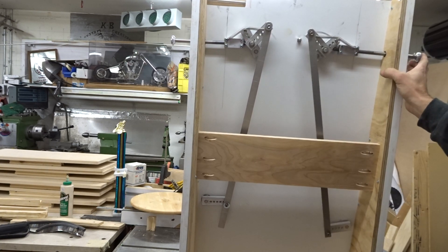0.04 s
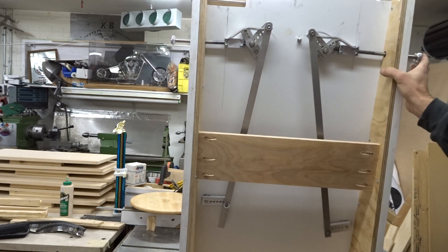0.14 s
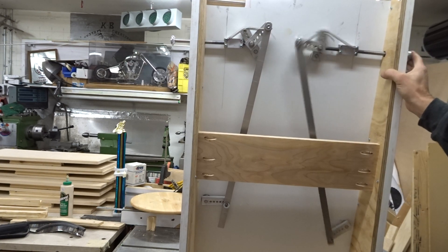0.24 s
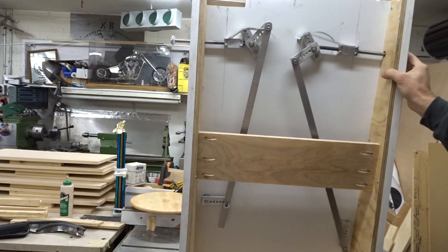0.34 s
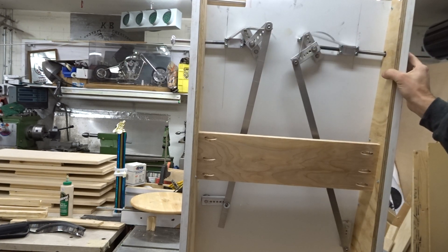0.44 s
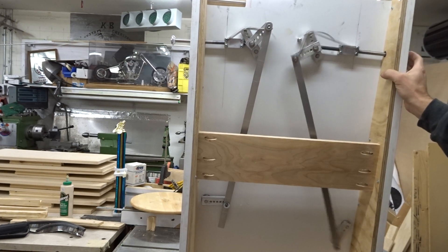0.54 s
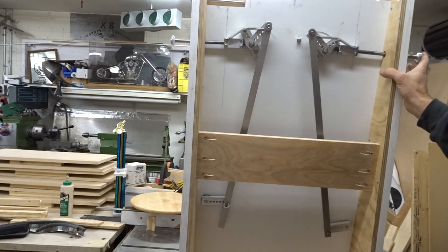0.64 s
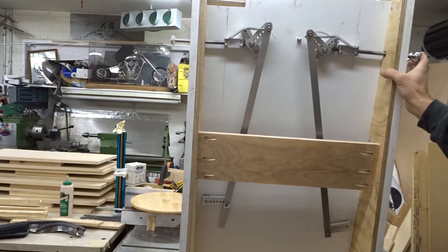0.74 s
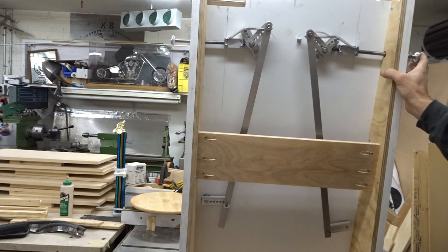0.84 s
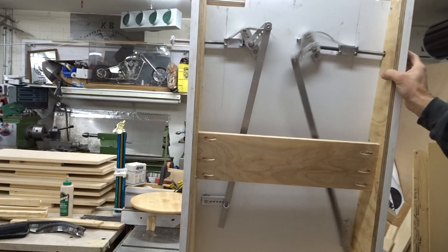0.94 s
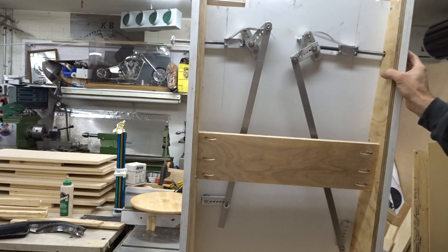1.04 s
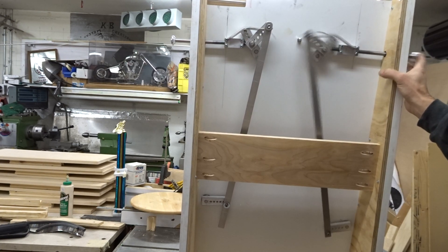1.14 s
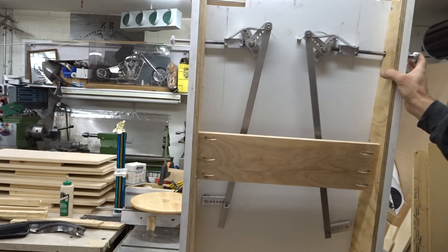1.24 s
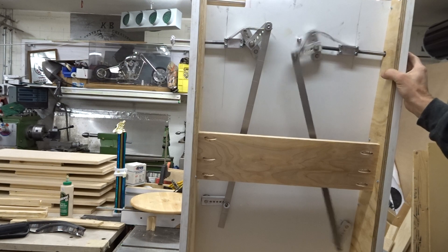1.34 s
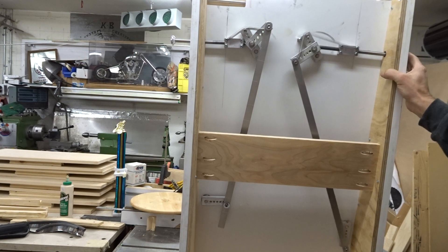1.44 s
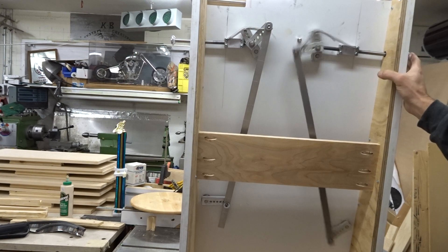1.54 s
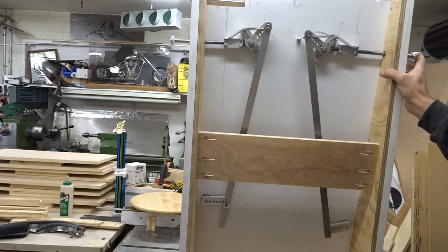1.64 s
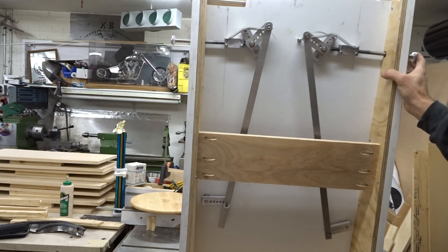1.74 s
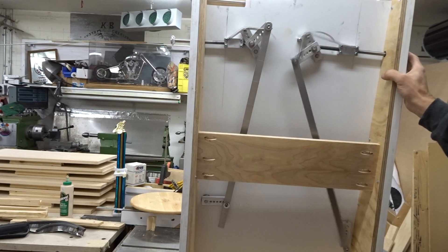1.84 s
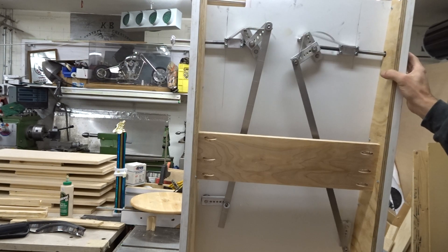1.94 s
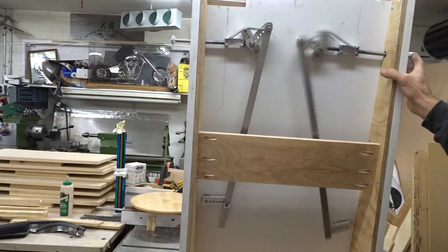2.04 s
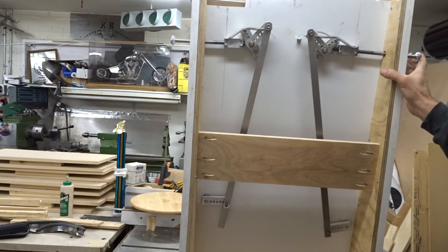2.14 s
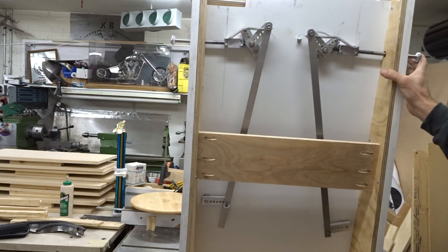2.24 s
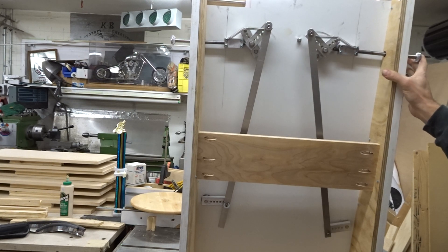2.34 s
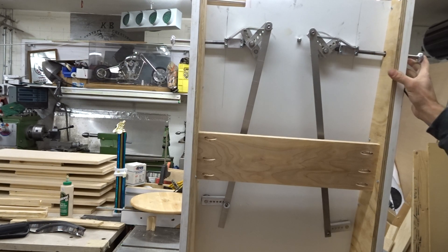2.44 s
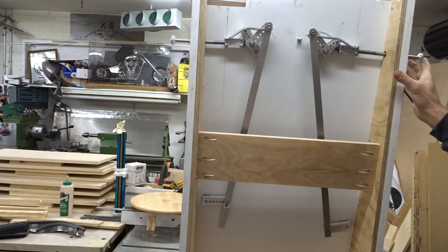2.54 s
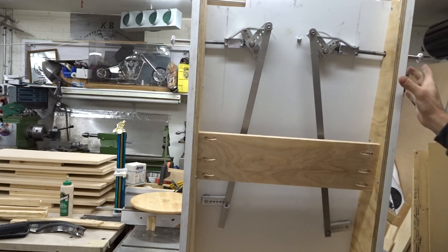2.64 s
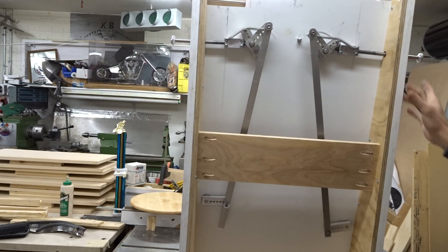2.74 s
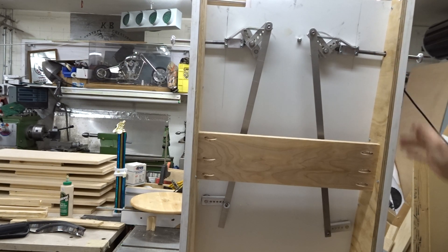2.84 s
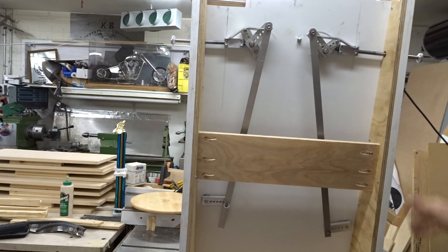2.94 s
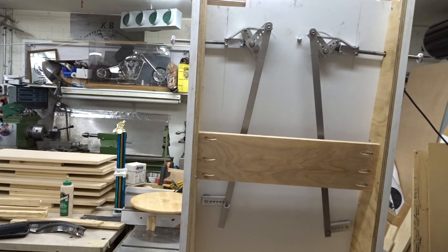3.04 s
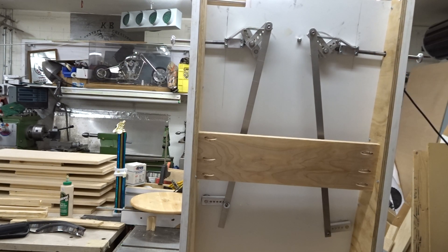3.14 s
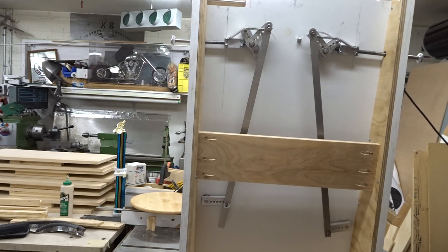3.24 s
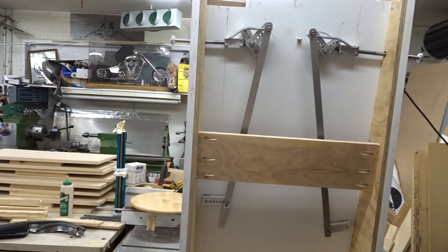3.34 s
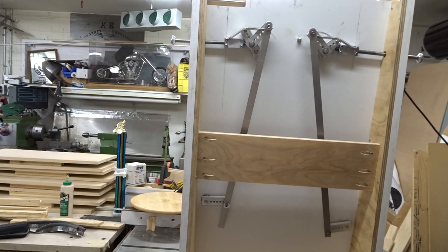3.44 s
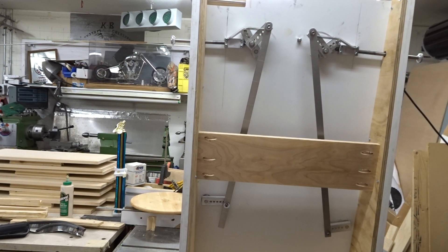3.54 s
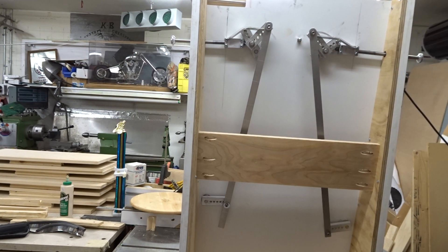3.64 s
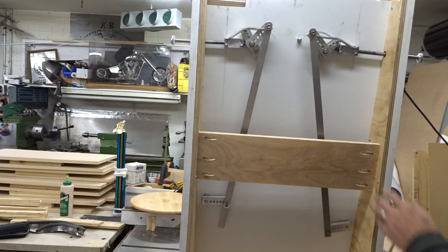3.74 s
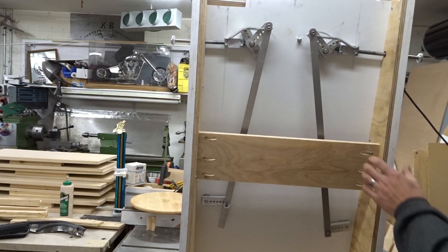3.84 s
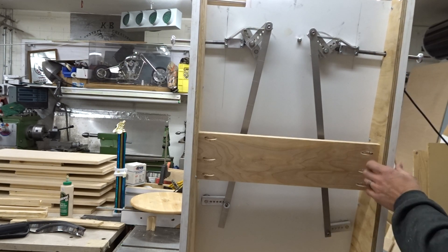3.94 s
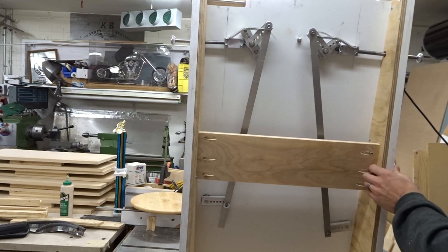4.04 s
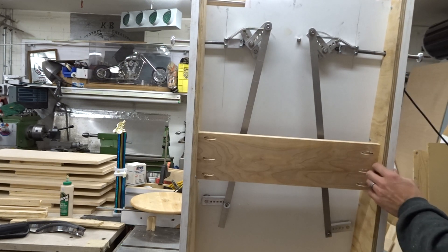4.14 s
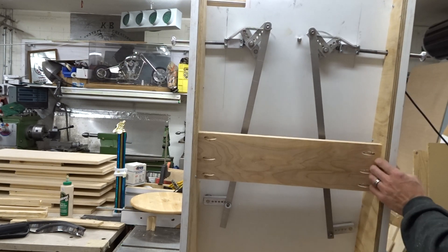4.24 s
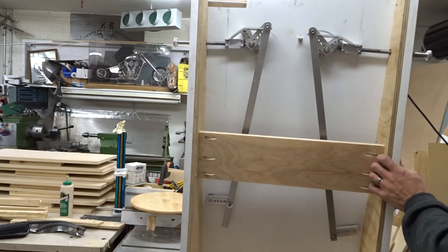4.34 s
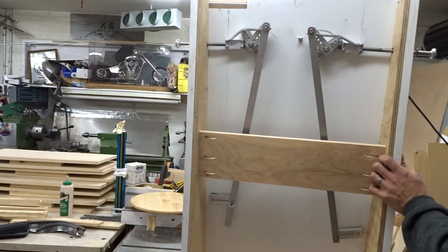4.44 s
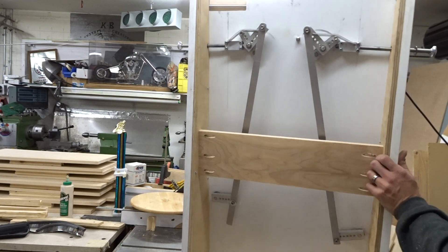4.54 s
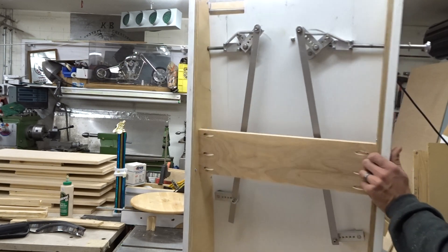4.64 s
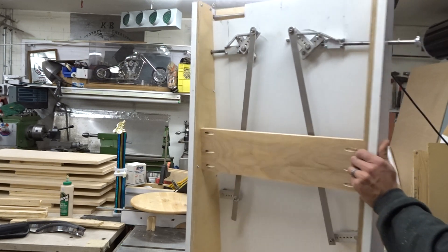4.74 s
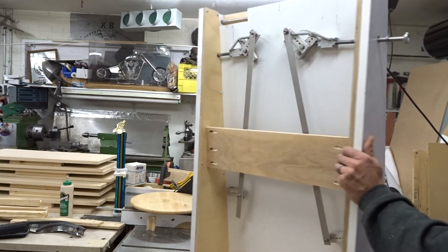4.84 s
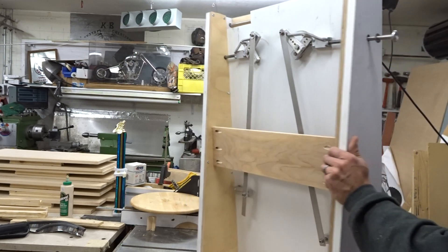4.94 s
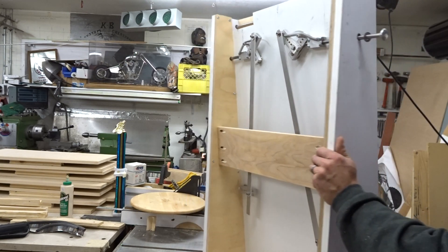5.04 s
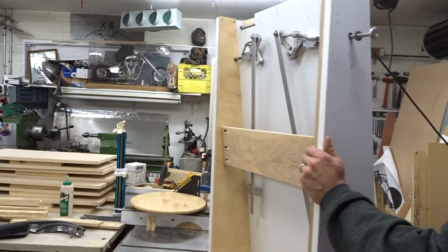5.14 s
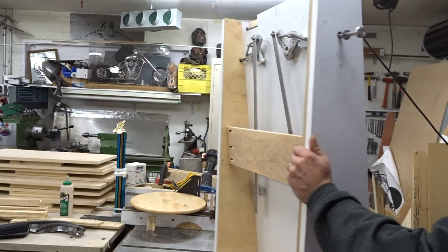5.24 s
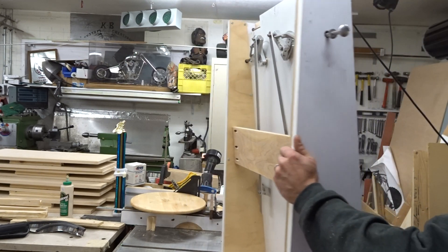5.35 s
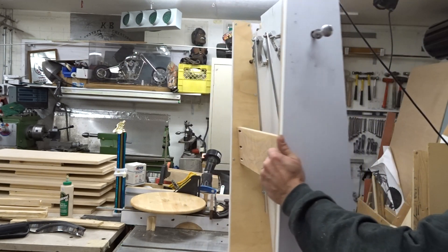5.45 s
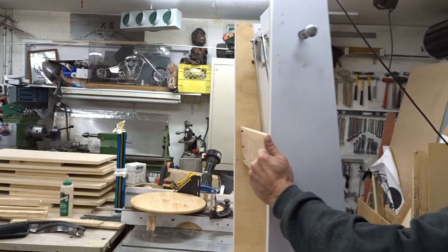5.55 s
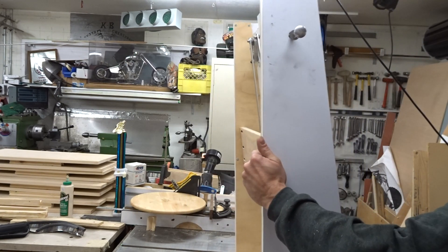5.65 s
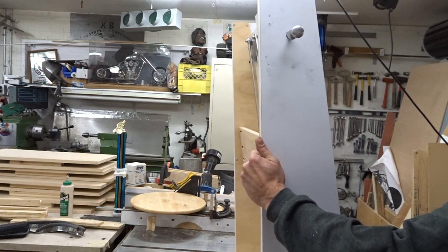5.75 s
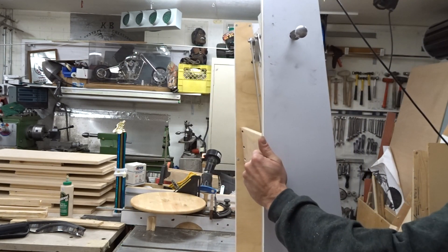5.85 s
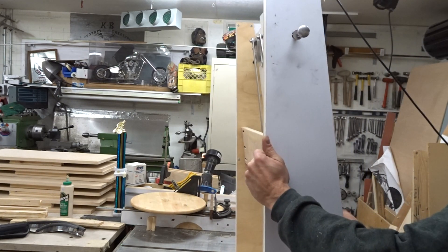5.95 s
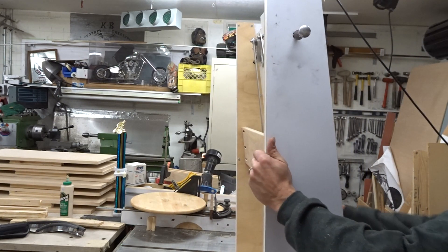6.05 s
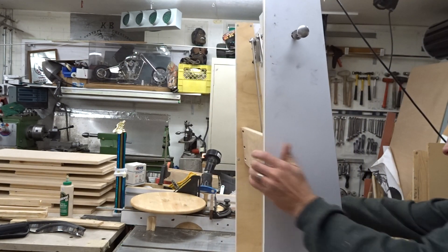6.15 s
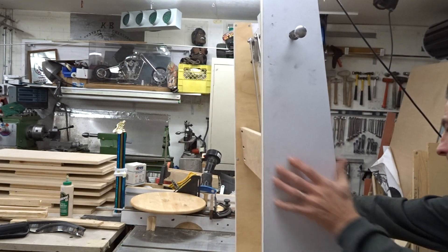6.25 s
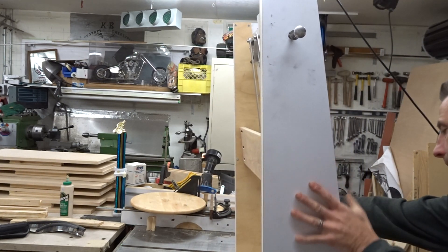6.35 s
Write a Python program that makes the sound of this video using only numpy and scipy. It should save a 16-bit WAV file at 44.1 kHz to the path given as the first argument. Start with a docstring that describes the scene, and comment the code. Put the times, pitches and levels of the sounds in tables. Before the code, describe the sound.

Rapid hard metal-and-wood clacks in a small workshop, a quiet pause with soft bumps, a grinding wooden scrape, dull thuds and a hand brush.

```python
"""You hear clacks, knocks, snaps and thin pings, then bumps, thuds, scraping and a soft bright hiss.
A steel flipper linkage on a wooden pinball cabinet is worked by hand in a small workshop: a push slides
the rod and slams a long flat bar on its stop, a release lets it fall back. The cabinet is then gripped,
scraped round on the bench and set down, and a hand brushes its side. Blows and tiny slips make wood
and steel ring; two sine tones make each ping. A limiter flattens the loud clacks."""
import sys
import numpy as np
from scipy import signal
from scipy.fft import rfft, irfft
from scipy.io import wavfile
from scipy.ndimage import uniform_filter1d, minimum_filter1d

SR = 44100
rng = np.random.default_rng(int(sys.argv[2]) if len(sys.argv) > 2 else 0)


def unload_audio(sound):
    """Save the sound as a 16-bit wav file, at the path given as the first command line argument."""
    columns = np.transpose(np.atleast_2d(sound))
    # keep every value between -1 and 1, then stretch to whole-number steps
    steps = np.round(np.clip(columns, -1, 1) * 32767)
    wavfile.write(sys.argv[1], SR, steps.astype(np.int16))


N = 282240
TIME = np.arange(N) / SR
TAIL = TIME[:SR * 3 // 4]   # time axis of every ring and echo

# tone colour of a wooden knock: [f/Hz, relative level per Hz/dB]
KNOCK_SPECTRUM = [(60, -43.5), (150, -8.5), (300, -3.5), (550, 2), (800, 3.5), (1200, 3.3), (1700, 3.3),
                  (2400, 1), (3300, -3.7), (4500, -10), (8000, -20.5), (16000, -58)]
# pushes: [start t/s, jolt t/s, stop t/s, contact time at the stop/s, take-up level/dB,
#          extra level of the wood at the stop and of the drive towards it/dB, spring ping level/dB]
PUSH_EVENTS = [(0.214, 0.248, 0.357, .011, -7.5, 1.5, -22.5), (0.926, 0.951, 0.995, .013, -0.5, 4, -20.5),
               (1.344, 1.346, 1.426, .006, -3, -0.5, -36), (1.809, 1.87, 1.898, .004, -7.5, -1, -40)]
# releases: [fall t/s, snap t/s, extra level of the wood in the fall and of the rush into it/dB,
#            snap level/dB, lower spring tone level/dB, upper spring tone level/dB]
RELEASE_EVENTS = [(-0.02, 0.0, -0.5, -9.5, -36, -23), (0.638, 0.667, 1, -1.2, -31, -20.5),
                  (1.177, 1.208, -1.5, 2, -18.5, -30), (1.611, 1.661, -12, -16.5, -20, -28.5),
                  (2.097, 2.12, 5.5, -0.5, -21.5, -33.5)]
# rod driven forward before each stop: [duration/s, wood level/dB, steel level/dB], before FRICTION_DB
DRIVE_RUB = (.085, -23.3, -27.3)


def from_db(db):
    """Turn decibels into a gain."""
    return 10 ** (np.asarray(db) / 20)


def rms_one(x):
    """Scale to an rms (average strength) of one."""
    return x / np.sqrt(np.mean(x ** 2) + 1e-20)


def fade(t, t60):
    """Free decay: energy leaks away steadily, 60 dB down after t60 seconds."""
    return np.exp(-np.log(1000) * t / t60)


def at_hz(points, hz):
    """Read a table between its points, on a log-frequency axis."""
    points = np.array(points)
    return np.interp(np.log(hz + 1), np.log(points[:, 0]), points[:, 1])


def colour(x, spectrum):
    """Give a steady signal the tone colour of a spectrum."""
    hz = np.fft.rfftfreq(x.shape[-1], 1 / SR)
    return rms_one(irfft(rfft(x) * from_db(at_hz(spectrum, hz)), x.shape[-1]))


def band(x, edges_hz, kind):
    """Butterworth filter that only looks back in time."""
    edges_hz = np.clip(edges_hz, 10, .45 * SR)
    return signal.sosfilt(signal.butter(2, edges_hz, kind, fs=SR, output="sos"), x)


def waver(rate_hz, depth_db):
    """A gain that wanders at random, one for each channel; depth_db is its rms swing."""
    return from_db(depth_db * rms_one(band(rng.standard_normal((2, N)), rate_hz, "low")))


def diffuse(size):
    """Sound from all around on two close microphones: alike in the bass, apart in the treble."""
    # difference between left and right against what they share: [f/Hz, side minus mid level/dB]
    side_levels = [(60, -19), (110, -29), (200, -35.5), (380, -21), (700, -15), (1290, -10), (2380, -6),
                   (4400, -4), (8120, -1.5), (15000, 2)]
    mid, side = rfft(rng.standard_normal((2, size)))
    width = from_db(at_hz(side_levels, np.fft.rfftfreq(size, 1 / SR)))
    return irfft((mid + side * width * [[1], [-1]]) / np.sqrt(1 + width ** 2), size)


def clicks(times, levels_db):
    """One impulse for each contact."""
    out = np.zeros(N)
    at = np.round(np.array(times) * SR).astype(int)
    heard = (at >= 0) & (at < N)
    out[at[heard]] = from_db(levels_db)[heard]
    return out


def contacts(times, lengths, levels_db):
    """Blows whose force swells and dies over the contact time; 0 dB carries unit energy."""
    pad = len(TAIL)   # room for blows that begin before the start or end after the finish
    out = np.zeros(N + 2 * pad)
    for s, length, db in zip(times, np.maximum(lengths, .001), levels_db):
        shape = TAIL * np.exp(-TAIL / length)
        at = pad + round(s * SR)
        out[at:at + pad] += from_db(db) * shape / np.linalg.norm(shape)
    return out[pad:pad + N]


def grains(per_s, spread_db):
    """Friction: tiny slips of uneven size at random moments."""
    sizes = from_db(spread_db * np.minimum(rng.exponential(1, N), 4)) * rng.choice([-1, 1], N)
    return rms_one(sizes * (rng.random(N) < per_s / SR))


def modes(table):
    """Ring of a struck body: one fading sine for each way it can vibrate."""
    ring = 0
    for k, (hz, db, t60) in enumerate(table):
        ring = ring + (-1) ** k * from_db(db) * np.sin(2 * np.pi * hz * TAIL) * fade(TAIL, t60)
    return rms_one(ring)


def wooden(table):
    """A ringing board; it radiates little below its lowest modes."""
    return band(band(modes(table), 89, "high"), 68.4, "high")


def burst(spectrum, t60):
    """Countless close modes that die together, made of fading noise."""
    return rms_one(colour(rng.standard_normal(len(TAIL)), spectrum) * fade(TAIL, t60))


def workshop(wet_db):
    """Room response: direct sound, a sample earlier on the right, then echoes that die band by band."""
    # how long the echoes last: [f/Hz, t60/s]
    echo_t60 = [(100, 0.27), (700, 0.245), (2000, 0.225), (6000, 0.19), (16000, 0.13)]
    noise = rfft(diffuse(len(TAIL)))
    hz = np.fft.rfftfreq(len(TAIL), 1 / SR)
    octave = np.round(np.log2(np.clip(hz, 128, 16384)))
    tail = 0
    for k in np.unique(octave):
        tail = tail + irfft(noise * (octave == k), len(TAIL)) * fade(TAIL, at_hz(echo_t60, 2 ** k))
    swelling_tail = tail * (1 - fade(TAIL, 0.0067))
    out = from_db(wet_db) * rms_one(swelling_tail) / np.sqrt(len(TAIL))
    out[[0, 1], [1, 0]] += 1   # direct sound: left at sample 1, right at sample 0
    return out


def sound(force, wet_db, body=(1,)):
    """A force drives a body in the room; a unit click gives rms 1 over its first 30 ms."""
    response = signal.fftconvolve(workshop(wet_db), np.array([body]), axes=1)[:, :len(TAIL)]
    response /= np.sqrt(np.mean(response[:, TAIL < .03] ** 2))
    return signal.fftconvolve(force[None], response, axes=1)[:, :N]


def workshop_rumble():
    """The quiet background of the workshop: steady noise, strongest in the bass."""
    # tone colour: [f/Hz, relative level per Hz/dB]
    rumble_spectrum = [(12, -48.5), (20, -28.5), (81, 1.5), (146, -13.5), (328, -15), (624, -14),
                       (802, -19), (1290, -14), (1960, -19.5), (2530, -23), (3250, -22.5), (16000, -37.5)]
    return from_db(-56.8) * colour(diffuse(N), rumble_spectrum)


def blow(s, kind, db=0, wood_db=0, contact_s=None):
    """One blow of a kind, as (t/s, contact time/s, boom/dB, knock/dB, steel/dB)."""
    usual_s, boom_db, knock_db, steel_db = kind
    return s, contact_s or usual_s, boom_db + db, knock_db + db + wood_db, steel_db + db


def blows():
    """A push is a take-up, a jolt and a slam; a release is a fall, a snap and a small bounce."""
    # kinds of blow: [contact time/s, panel boom level/dB, wooden knock level/dB, steel level/dB]
    # the rod takes up its play
    take_up = (.004, -36, -33, -40)
    # the moving rod strikes its guide
    guide_jolt = (.0045, -40, -31.5, -55)
    # the bar hits its stop
    slam = (.006, -12, -13, -11.5)
    # the bar falls back
    fall_back = (.012, -22.5, -12.5, -29)
    # the joints snap home
    joint_snap = (.0045, -21.5, -13.5, -12)
    # the bar bounces once after the snap
    bounce = (.003, -38, -41, -37)
    # the loose rod drops in its guide
    rod_drop = (.0045, -48, -21.8, -43)
    # the hand lets go and the rod settles: [t/s, contact time/s, added level/dB]
    rod_settles = [(2.492, .0045, 0), (2.58, .014, -21), (2.674, .015, -11), (2.8, .02, -25)]
    bounce_delay_s = .05
    rows = [blow(s, rod_drop, db, contact_s=contact_s) for s, contact_s, db in rod_settles]
    for start, jolt, stop, contact_s, take_up_db, wood_db, _ in PUSH_EVENTS:
        rows.append(blow(start, take_up, take_up_db))
        rows.append(blow(jolt, guide_jolt))
        rows.append(blow(stop, slam, wood_db=wood_db, contact_s=contact_s))
    for fall, snap, wood_db, snap_db, _, _ in RELEASE_EVENTS:
        rows.append(blow(fall, fall_back, wood_db=wood_db))
        rows.append(blow(snap, joint_snap, snap_db))
        rows.append(blow(snap + bounce_delay_s, bounce))
    return np.transpose(rows)


def rubbing():
    """Drag of the rod on wood and steel: driven to the stop, held there, rushing back, then swaying on."""
    # levels below are before FRICTION_DB
    # rod held against the stop: [wood level/dB, steel level/dB]
    hold_levels = (-33.5, -43.5)
    # gathering speed into each fall: [time constant/s, wood level/dB, steel level/dB]
    rush_rub = (.007, -22, -32)
    # swaying after each snap: [t60/s, wood level/dB, steel level/dB]
    sway_rub = (1.4, -38.5, -68)
    FRICTION_DB = -39   # force of steady rubbing against that of a blow
    speed_up_s = .025

    def slide(start, stop):
        """Rubbing that grows as the rod speeds up and ends at once."""
        return np.clip((TIME - start) / speed_up_s, 0, 1) * (TIME < stop)

    drive = np.zeros(N)
    for start, _, stop, _, _, wood_db, _ in PUSH_EVENTS:
        begin = max(start, stop - DRIVE_RUB[0] - speed_up_s / 2)
        drive += from_db(wood_db) * slide(begin, stop)
    # each push is held until the next fall
    hold = sum(slide(stop, fall) for (_, _, stop, *_), (fall, *_) in zip(PUSH_EVENTS, RELEASE_EVENTS[1:]))
    rush, sway = np.zeros(N), np.zeros(N)
    for fall, snap, wood_db, *_ in RELEASE_EVENTS:
        rush += np.exp(-np.abs(TIME - fall) / rush_rub[0]) * from_db(wood_db)
        sway = np.maximum(sway, (TIME > snap) * fade(np.abs(TIME - snap), sway_rub[0]))
    levels_db = np.transpose([DRIVE_RUB[1:], hold_levels, rush_rub[1:], sway_rub[1:]]) + FRICTION_DB
    return from_db(levels_db) @ np.array([drive, hold, rush, sway])


def linkage():
    """Blows and sliding shake the panel, the wooden frame and the steel bar."""
    # modes of the panel: [f/Hz, relative level/dB, t60/s]
    panel_modes = [(131.6, -15, 0.26), (195, -6, 0.21), (247, -3, 0.16), (295, 5.5, 0.19),
                   (356, -1.5, 0.18), (482.5, -10.5, 0.16), (755, 2, 0.055), (795, -3.5, 0.14)]
    # bending modes of the flat bar: [f/Hz, relative level/dB]
    bar_modes = [(4590, -18), (5190, -2.5), (5800, -2.5), (6470, 2), (7235, -5), (8012, 0.5), (8790, -2.5),
                 (9590, 1), (10420, -2), (11390, -4), (12270, 1), (13200, -17), (14200, 5.5), (15170, 0.5)]
    # tone colour of the sharp crack: [f/Hz, relative level per Hz/dB]
    crack_spectrum = [(60, -55), (500, -19), (2000, -5), (4000, 1.5), (10000, 0), (16000, 0.5)]
    bar_t60_s, rebound_s = 0.027, 0.0289
    s, length, boom_db, knock_db, steel_db = blows()
    wood_drag, steel_drag = rubbing()
    slips = grains(per_s=1400, spread_db=-0.5)
    # the harder the blow, the more of it comes back in a rebound, up to a limit
    rebound_db = -2 + .4 * np.minimum(steel_db - 10.5, 0)
    wood_blows = contacts(s, length, knock_db - 2)
    wood_blows += contacts(s + rebound_s, length * 0.89, knock_db + rebound_db)
    steel_blows = contacts(s, length + 0.0026, steel_db)
    steel_blows += contacts(s + rebound_s, length * 0.83, steel_db + rebound_db)
    # every blow is a cluster of tiny contacts, so each has a colour of its own
    wood = colour(grains(per_s=3000, spread_db=3.5), KNOCK_SPECTRUM)
    dull_wood = colour(grains(per_s=3000, spread_db=4.0), KNOCK_SPECTRUM)
    dull_wood = rms_one(band(dull_wood, 1530, "low"))
    dull_force = contacts(s, length * 1.4, boom_db - 8.5) + wood_drag
    knocks = wood * wood_blows + dull_wood * dull_force
    booms = clicks(s + length, boom_db) + from_db(-19.5) * wood_drag * slips
    # a short contact snaps, a long one only sets the loose joints chattering
    snaps = clicks(s, steel_db - 2100 * length) + (steel_blows + steel_drag) * slips
    bar = sound(snaps, wet_db=3, body=modes([(hz, db, bar_t60_s) for hz, db in bar_modes]))
    crack = sound(snaps, wet_db=-1, body=burst(crack_spectrum, t60=0.005))
    steel = (bar + crack) / np.sqrt(2)
    panel = sound(booms, wet_db=-10, body=wooden(panel_modes))
    return panel + sound(knocks, wet_db=0) + steel


def spring():
    """Take-ups and snaps ping two close high tones that swell, beat and die."""
    # lower and upper tone: [f/Hz, f/Hz]
    tone_hz = (9705, 9914)
    free_t60_s, pressed_t60_s = 1.2, .17   # the second adds its decay to the first
    push_upper_tone_db = -8   # a push rings mostly the lower tone
    pings = [(start, db, db + push_upper_tone_db) for start, *_, db in PUSH_EVENTS]
    pings += [(snap, low_db, high_db) for _, snap, _, _, low_db, high_db in RELEASE_EVENTS]
    levels = np.zeros((2, N))
    for s, low_db, high_db in pings:
        age = np.maximum(TIME - s, 0)
        # the next slam presses on the spring and damps it, from halfway through the drive
        next_stop = min([stop for _, _, stop, *_ in PUSH_EVENTS if stop > s], default=TIME[-1])
        pressed = next_stop - DRIVE_RUB[0] / 2
        ring = fade(age, free_t60_s) * (1 - fade(age, 0.15))
        ring = ring * fade(np.maximum(TIME - pressed, 0), pressed_t60_s)
        levels += np.outer(from_db([low_db, high_db]), ring)
    arrival = TIME + np.array([[0], [1]]) / SR   # a sample earlier on the right
    tones = sum(level * np.sin(2 * np.pi * hz * arrival) for level, hz in zip(levels, tone_hz))
    # their level wanders at random on each channel
    return tones * waver(21, depth_db=3.0)


def handling():
    """Soft bumps of the hand, ticks, and the dull thuds of the cabinet settling."""
    # hands and bench against the cabinet: [t/s, contact time/s, level/dB, cut-off f/Hz]
    bump_events = [(3.844, 0.01, -40, 620), (3.905, 0.034, -46.5, 6000), (4.106, 0.0064, -61, 3020),
                   (4.466, 0.0046, -48.5, 4000), (5.658, 0.012, -42, 520), (5.816, 0.0034, -46, 553),
                   (5.868, 0.0026, -58, 4970), (6.23, 0.0055, -51.5, 5000)]
    # small loose fittings tick: [t/s, level/dB, ring f/Hz]
    tick_events = [(3.845, -45, 2990), (4.266, -43, 4100)]
    # the cabinet rocks on the bench: [t/s, level/dB]
    thud_events = [(3.857, -57), (4.398, -47.5), (4.554, -50), (5.661, -33), (5.817, -38.5)]
    # modes of the whole cabinet: [f/Hz, relative level/dB, t60/s]
    cabinet_modes = [(159.6, 1.5, 0.05), (173, 4.5, 0.061), (279, -9.5, 0.14), (516, -21, 0.089)]
    # tone colour of a tick: [f/Hz, relative level per Hz/dB]
    tick_spectrum = [(100, -38), (1000, -27), (4000, 7), (7000, 6), (16000, -21)]
    wood = colour(grains(per_s=5000, spread_db=4.5), KNOCK_SPECTRUM)
    bumps = np.zeros(N)
    for s, length, db, soft_hz in bump_events:
        bumps += rms_one(band(wood, soft_hz, "low")) * contacts([s], [length], [db])
    ticks = 0
    for s, db, hz in tick_events:
        fitting = modes([(hz, 0, .04)]) + burst(tick_spectrum, t60=0.034)
        ticks = ticks + sound(clicks([s], [db]), wet_db=12, body=fitting)
    thuds = sound(clicks(*np.transpose(thud_events)), wet_db=-9.5, body=wooden(cabinet_modes))
    return sound(bumps, wet_db=1) + ticks + thuds


def turning():
    """Wood drags over the bench: dense slips rumble, grind and hiss with speed; a dug-in edge adds weight."""
    # speed of the turning cabinet, given as a level before the offsets below: [t/s, level/dB]
    speed_points = [(4.32, -49), (4.614, -41), (4.636, -38), (4.86, -34), (5.05, -36), (5.4, -35),
                    (5.64, -46)]
    # offsets from the speed level: [rumble level/dB, grind level/dB, hiss level/dB]
    part_levels = (-19, -10.3, -0.3)
    # an edge digs in as the cabinet tips: [t/s, half length/s, extra rumble level/dB, extra grind level/dB]
    edge_digs = [(4.39, .13, 14, 1), (4.74, .14, 11, 12.5), (5.39, .15, 11.5, 2), (5.6, .1, 0, 7)]
    # tone colour of the scrape: [f/Hz, relative level per Hz/dB]
    scrape_spectrum = [(65, -55), (110, -32), (174, -2.5), (228, -13), (293, 1.5), (376, -9.5), (796, -0.5),
                       (981, -8.5), (1040, -4), (1340, -6), (1650, -6), (2120, -6), (5190, -3),
                       (9910, -14.5), (16000, -20.5)]
    start_s, stop_s = 0.16, 0.11   # how gently the motion begins and ends
    s, speed_db = np.transpose(speed_points)
    digging = np.zeros((3, N))
    for at, half_s, rumble_db, grind_db in edge_digs:
        digging += np.outer([rumble_db, grind_db, 0], np.exp(-((TIME - at) / half_s) ** 2))
    levels = np.interp(TIME, s, speed_db) + np.array(part_levels)[:, None] + digging
    slips = colour(grains(per_s=5000, spread_db=3.5), scrape_spectrum)
    drag = signal.fftconvolve(slips[None], workshop(wet_db=0.5), axes=1)[:, :N]
    before = np.maximum(s[0] - TIME, 0) / start_s
    after = np.maximum(TIME - s[-1], 0) / stop_s
    moving = np.exp(-before ** 2 - after ** 2)
    ranges_hz = [(130, 450), (450, 2000), (2000, 16000)]   # rumble, grind, hiss
    # one random gain for both channels, as the wood catches
    catching = [waver(19, depth_db=1.5)[0], waver(30, depth_db=1.8)[0], waver(40, depth_db=0.86)[0]]
    scrape = 0
    for k, edges_hz in enumerate(ranges_hz):
        part = rms_one(band(drag, edges_hz, "band"))
        scrape = scrape + (-1) ** k * from_db(levels[k]) * catching[k] * part
    return moving * scrape


def palm():
    """Skin brushing over paint gives a fine bright hiss."""
    # palm on the painted side: [t/s, level/dB]
    stroke_points = [(6.1, -70), (6.18, -51), (6.235, -59), (6.29, -46.5), (6.39, -43.5)]
    # tone colour of the hiss: [f/Hz, relative level per Hz/dB]
    brush_spectrum = [(590, -57), (1000, -6), (1180, -34), (1310, -19.5), (2620, 4.5), (11300, 3),
                      (16000, 2)]
    level_db = np.interp(TIME, *np.transpose(stroke_points), left=-120)
    return from_db(level_db) * colour(diffuse(N), brush_spectrum)


def scene():
    """All sources over the quiet rumble of the workshop."""
    return workshop_rumble() + linkage() + spring() + handling() + turning() + palm()


def limiter(x, ceiling_db, release_db_per_s):
    """Gain drops just ahead of each peak and recovers steadily."""
    over = np.maximum(20 * np.log10(np.abs(x).max(axis=0) + 1e-9) - ceiling_db, 0)
    recovery = release_db_per_s * TIME
    held = np.maximum.accumulate(over + recovery) - recovery
    # 45 samples, about 1 ms: look ahead, then smooth
    return x * from_db(uniform_filter1d(minimum_filter1d(-held, size=45), size=45))


def record(dry):
    """The limiter holds the clacks down; a steep filter cuts the top above 15850 Hz."""
    limited = limiter(dry, ceiling_db=-5.5, release_db_per_s=149)
    return signal.sosfilt(signal.ellip(12, .1, 80, 15850, fs=SR, output="sos"), limited)


dry = scene()
out = record(dry)
unload_audio(out)
```